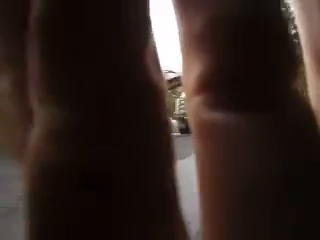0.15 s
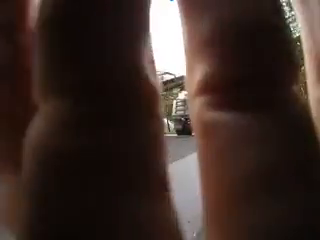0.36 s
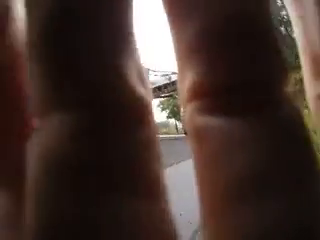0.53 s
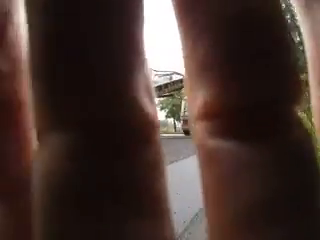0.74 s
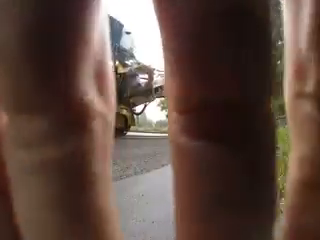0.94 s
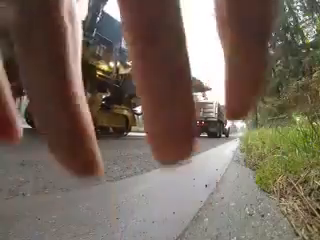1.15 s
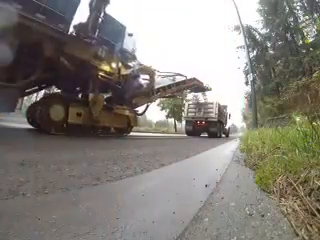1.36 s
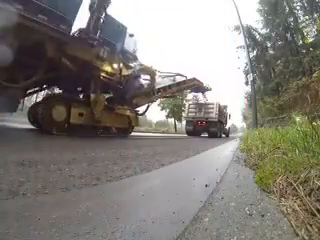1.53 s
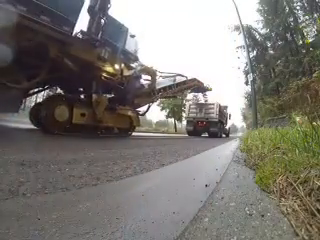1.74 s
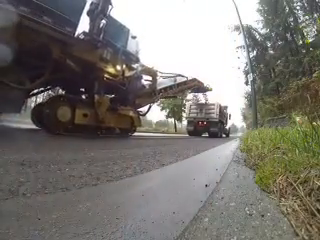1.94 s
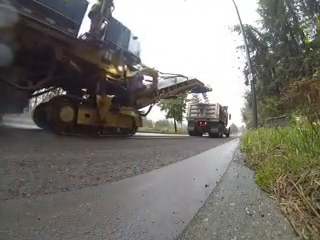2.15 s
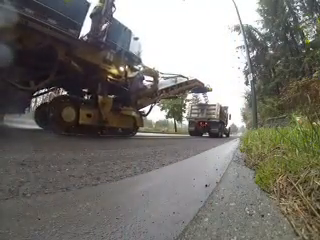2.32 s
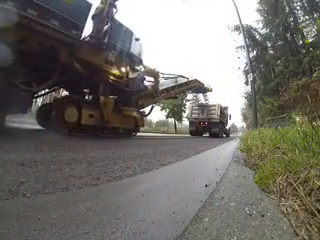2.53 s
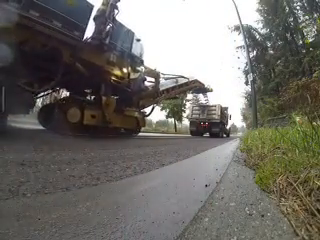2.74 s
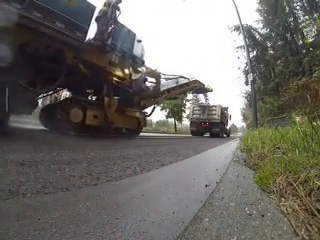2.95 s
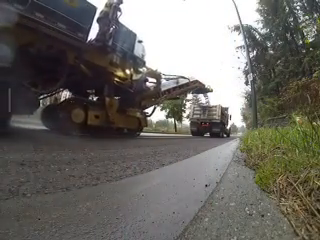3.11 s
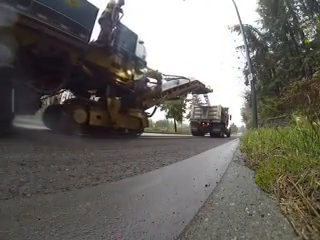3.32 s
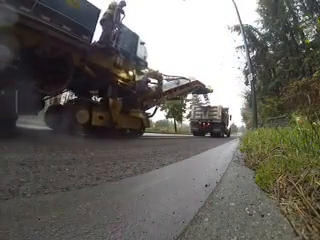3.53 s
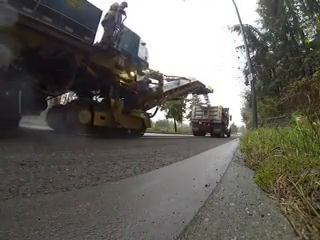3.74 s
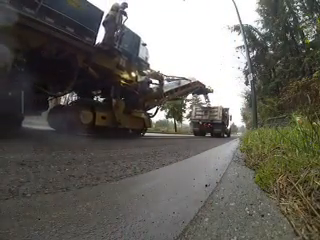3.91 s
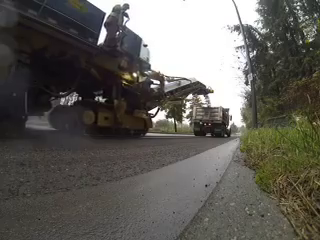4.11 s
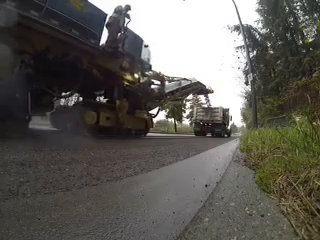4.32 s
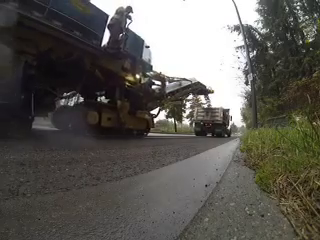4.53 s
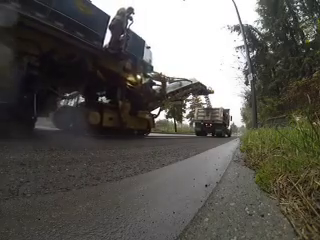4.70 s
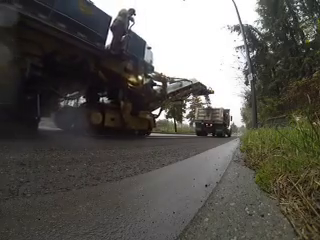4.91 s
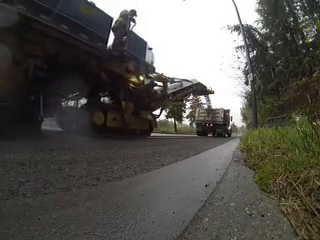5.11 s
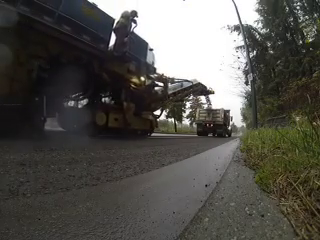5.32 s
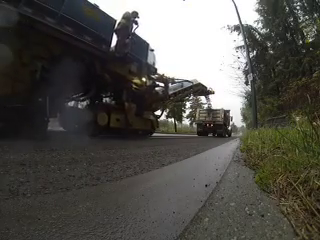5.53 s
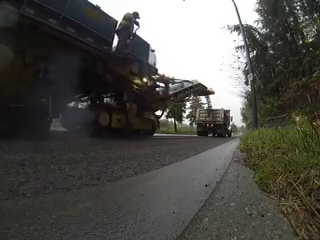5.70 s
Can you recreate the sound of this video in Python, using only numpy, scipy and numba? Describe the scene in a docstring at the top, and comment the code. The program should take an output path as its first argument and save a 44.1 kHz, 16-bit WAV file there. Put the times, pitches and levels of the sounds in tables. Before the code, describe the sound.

Outdoor roadside, microphone boxed inside a small case near the ground. Nasal engine rattle, drum rumble and thin gear whine start at once; a sharp bump, a cluster of clicks with a short scuff, and a duller set-down thud follow quickly. The level dips, creeps back louder, and a low throbbing hum settles under continuous grinding to the end.

```python
"""A diesel road miller grinds asphalt near a small camera in a hard case, which a hand sets down on the kerb.
Engine clatter repeats each cycle through the case resonances; pumps and gears whine as wavering tones.
Drum and ground rumble are shaped noise, the boom a restless tone; knocks ring case modes, and a scuff is noise.
Loud knocks push the gain control down, and it creeps back up."""
import sys
import numpy as np
from scipy import signal
from scipy.fft import rfft, irfft
from scipy.io import wavfile
from scipy.ndimage import uniform_filter1d
from numba import njit

SR = 44100
rng = np.random.default_rng(int(sys.argv[2]) if len(sys.argv) > 2 else 0)


def transcribe(signal):
    """Save signal, clipped to [-1, 1], as a 16-bit WAV file at the path in sys.argv[1]."""
    frames = np.atleast_2d(signal).T
    limited = np.clip(frames, -1, 1)
    pcm = np.round(limited * 32767).astype(np.int16)
    wavfile.write(sys.argv[1], SR, pcm)


N = 254016
T = np.arange(N) / SR

# engine: one cycle is two crank turns
CYCLE_HZ, CYLINDERS, FIRING_DB = 18.465, 8, 0.5
REPEAT_SHARE, MEMORY = 0.61, 0.83  # power share that repeats; part kept from cycle to cycle
ORDERS_DB, RATTLE_DB = -2.5, -19
# levels beside the clatter
RUMBLE_DB, WHINE_BESIDE_DB, GRIT_DB = -2.5, -13, -30
WAVER_DB, PITCH_WAVER_HZ = 2.2, 2.56
# ground rumble in the hand, on the kerb, and its slow growth
GROUND_HELD_DB, GROUND_DOWN_DB, GROUND_RISE_DB_S = -41, -26, 0.61
# the hand lets go; tanh time scale; level changes while it holds the case
LET_GO_S, GRIP_S = 1.11, 0.3
HAND_RUMBLE_DB, HAND_WHINE_DB = 0.5, 0.5
HAND_TOP_DB, HAND_BASS_DB = -5.5, -3
# knocks: length of the push, decay constant of the crack
PUSH_S, CRACK_S = 0.00032, 0.0019
SCUFF_START_S, SCUFF_TOP_S, SCUFF_END_S = 0.401, 0.437, 0.476
SCUFF_TOP_DB, SCUFF_RISE_DB_S, SCUFF_FALL_DB_S = -17, 520, 300
# boom: slow and quick pitch spread, noise beside the tone, rms throb as a share of the level
BOOM_WANDER_HZ, BOOM_SPREAD_HZ = 4.987, 4.98
BOOM_ROUGH_DB, BOOM_THROB = -2, 0.4
GAIN_TOP_DB, ATTACK_S, RELEASE_DB_S = -1.5, 0.00026, 8.5
TOP_HZ = 15100


def undb(db):
    """dB to gain."""
    return 10 ** (np.asarray(db) / 20)


def unit(x):
    """Scale to rms 1."""
    return x / np.sqrt(np.mean(x ** 2))


def colour(x, points):
    """Shape the spectrum by (frequency [Hz], level [dB]) points, silent outside them; rms 1."""
    hz, db = np.transpose(points)
    log_f = np.log(np.arange(N // 2 + 1) * SR / N + 1)
    gain = undb(np.interp(log_f, np.log(hz), db, -150, -150))
    return unit(irfft(rfft(x) * gain, N))


def walk(rate_hz):
    """Random levels held 1 / rate_hz seconds and slewed; rms 1."""
    k = int(SR / rate_hz)
    steps = np.repeat(rng.standard_normal(N // k + 1), k)
    return unit(uniform_filter1d(uniform_filter1d(steps, k), k)[:N])


def ring(x, hz, t60_s):
    """One mode: a sine that decays 60 dB in t60_s."""
    pole = np.exp((2j * np.pi * hz - np.log(1000) / t60_s) / SR)
    return signal.lfilter([1], [1, -pole], x).imag


def wavering_tones(tones):
    """Sum of steady sines, each wavering in level and a little in pitch."""
    total = np.zeros(N)
    for hz, db in tones:
        gain = undb(db + WAVER_DB * walk(7))
        cycles = np.cumsum(hz + PITCH_WAVER_HZ * walk(6)) / SR
        total += gain * np.sin(2 * np.pi * cycles + 7 * rng.random())
    return total * np.sqrt(2)


def clatter(held):
    """Valves and firings repeat their rattle each cycle and slowly forget it; grinding picks never repeat."""
    # case's two lower resonances: (frequency [Hz], density [dB per Hz])
    lower_points = [(410, -36), (700, -19.5), (950, -17.5), (1120, -11.5), (1240, -1), (1390, 2),
                    (1540, -0.5), (1990, -24), (2480, -20), (2700, -14), (2900, -14.5), (2970, -21.5),
                    (3300, -25.5), (4290, -39), (7260, -120)]
    # case's upper resonances: (frequency [Hz], density [dB per Hz])
    upper_points = [(1940, -42), (3300, -7.5), (3690, 0.5), (3970, -8.5), (4260, -6.5), (4360, -12),
                    (4500, -4), (4760, 0.5), (4960, 3.5), (5550, -10), (6500, -16.5), (8450, -47),
                    (14300, -120)]
    # strongest engine orders in the case resonance: (multiple of the cycle [-], level before ORDERS_DB [dB])
    order_levels = [(58, -24), (66, -16), (69, -12), (74, -10), (81, -12), (84, -14)]
    lag = round(SR / CYCLE_HZ)
    fresh = rng.standard_normal((N // lag + 30, lag))  # one row per cycle
    engine = unit(signal.lfilter([1], [1, -MEMORY], fresh, axis=0).ravel()[-N:])
    engine *= undb(FIRING_DB * np.sin(2 * np.pi * CYLINDERS * CYCLE_HZ * T))
    picks = rng.standard_normal(N) * undb(2.0 * walk(60))
    shaking = np.sqrt(REPEAT_SHARE) * engine + np.sqrt(1 - REPEAT_SHARE) * unit(picks)

    upper = colour(shaking + 0.7 * picks, upper_points)
    top_band = signal.butter(2, [4600, 5600], "bandpass", fs=SR, output="sos")
    top = signal.sosfilt(top_band, upper)
    upper = upper + (undb(HAND_TOP_DB * held) - 1) * top  # the hand damps the highest resonance
    orders = wavering_tones([(k * CYCLE_HZ, db + ORDERS_DB) for k, db in order_levels])
    return colour(shaking, lower_points) + undb(RATTLE_DB) * upper + orders


def grit_hiss():
    """Grit and fan: coloured noise, uneven in level."""
    # (frequency [Hz], density [dB per Hz])
    hiss_points = [(3410, -30), (5800, -4.5), (6940, -9), (7810, -5), (9160, -14.5), (9960, -12),
                   (11400, -16), (12300, -21.5), (13800, -19.5), (14400, -22), (15000, -31.5)]
    noise = rng.standard_normal(N) * undb(0.67 * walk(60))
    return colour(noise, hiss_points) * undb(GRIT_DB + 0.5 * walk(12))


def drum_rumble(held):
    """Drum in the asphalt, through air and ground; the soft hand keeps ground-borne bass away."""
    # (frequency [Hz], density [dB per Hz])
    rumble_points = [(18, -37), (30, -10), (47, -3.5), (65, -6), (100, -2.5), (200, -6), (300, -13),
                     (470, -13), (750, -24.5), (1000, -23.5)]
    gain = undb(RUMBLE_DB + HAND_RUMBLE_DB * held + 0.61 * walk(4.76))
    rumble = colour(rng.standard_normal(N), rumble_points) * gain
    bass = signal.sosfiltfilt(signal.butter(2, 200, fs=SR, output="sos"), rumble)
    return rumble + (undb(HAND_BASS_DB * held) - 1) * bass


def ground_rumble(held):
    """Coloured noise through the ground, weak in the hand, stronger on the kerb and slowly growing."""
    # (frequency [Hz], density [dB per Hz])
    ground_points = [(60, -23), (100, -14), (150, 0), (190, -11), (213, 5.5), (235, -3.5), (260, -3),
                     (300, -13.5), (400, -39)]
    down_db = GROUND_DOWN_DB + GROUND_RISE_DB_S * T
    db = GROUND_HELD_DB * held + down_db * (1 - held)
    return colour(rng.standard_normal(N), ground_points) * undb(db)


def whine(held):
    """Pumps and gears: wavering tones; the high gears are clearer while the case faces them."""
    # pump and gear tones: (frequency [Hz])
    tone_hz = [1044, 2089, 2234, 2417, 2611, 2654, 2700, 2749, 2797, 2843, 2939, 2987, 3132, 3224, 3418,
               3655, 4911, 5532]
    # their levels beside the whine: (level [dB])
    tone_db = [-12.5, -22.5, -15, -23.5, -9, -16, -22, -11.5, 0.5, -17, -20, -12.5, -18, -24.5, -17.5,
               -16.5, -15.5, -30]
    # high gear tones: (frequency [Hz], level before the lift [dB])
    gear_tones = [(4175, -17), (4550, -28)]
    # (time [s], lift [dB])
    gear_lift = [(0, -2), (.1, 5), (.28, 3), (.4, -4)]
    lift = undb(np.interp(T, *np.transpose(gear_lift)))
    tones = wavering_tones(zip(tone_hz, tone_db)) + lift * wavering_tones(gear_tones)
    return tones * undb(WHINE_BESIDE_DB + HAND_WHINE_DB * held)


def knocks():
    """Each knock is a short soft push on the case modes; a dry crack of noise goes with it."""
    # (time [s], sharp level [dB], heavy level [dB], direction [+1 or -1], part struck [name])
    knock_list = [(0.2877, 2.5, -0.5, 1, "corner"), (0.2907, -7, -19, 1, "corner"),
                  (0.403, -12, -26, 1, "edge"), (0.418, -14, -26, 1, "edge"), (0.431, -11, -14, 1, "edge"),
                  (0.435, -12, -28, 1, "edge"), (0.438, 0, -6.5, -1, "edge"), (0.4514, -5.5, -8, 1, "edge"),
                  (0.459, -12, -11, -1, "lip"), (0.5626, -6.5, -11, -1, "base"),
                  (0.5684, -13, -5.5, 1, "base"), (0.5729, -4.5, -7.5, 1, "base"),
                  (.5760, -9.5, 0, -1, "base"), (0.59, -25, -23, 1, "base")]
    # tick, clack, ringing thud, dead thud, wobble, hollow, two high clicks: (frequency [Hz], t60 [s])
    case_modes = [(1325, 0.02), (2400, 0.01), (92.4, 0.35), (100, 0.026), (290, 0.12), (335, 0.031),
                  (3300, .02), (4460, .015)]
    # drive of each mode by part: thuds, wobble, hollow beside the heavy level, others beside the sharp [dB]
    part_drive = {"corner": (0, -17, -11.5, -1, -25.5, -18, -30, -34),
                  "edge": (0, -15, -28, 3, -9, -15, -24, -36),
                  "base": (-2.5, -8.5, -22, 0, -16, -2, -16, -18),
                  "lip": (0, -6, -25, -1, -2, -24, -14, -34)}
    blows = np.zeros((len(case_modes), N))
    for s, sharp_db, heavy_db, way, part in knock_list:
        base_db = [sharp_db] * 2 + [heavy_db] * 4 + [sharp_db] * 2
        blows[:, int(s * SR)] = way * undb(np.add(base_db, part_drive[part]))
    push = np.hanning(int(PUSH_S * SR) + 3)
    blows = signal.lfilter(push / push.sum(), [1], blows)
    rings = sum(ring(blow, hz, t60_s) for blow, (hz, t60_s) in zip(blows, case_modes))

    # the clack drive sets the crack envelope
    burst = signal.lfilter([1], [1, -np.exp(-1 / (CRACK_S * SR))], np.abs(blows[1]))
    crack_points = [(300, -13), (2500, 13), (5000, -12.5), (9000, -19.5), (15000, -36)]
    crack = colour(rng.standard_normal(N), crack_points)
    return rings + uniform_filter1d(burst, size=30) * crack


def scuff():
    """Uneven stick and slip of the case on stone: noise that swells and dies away."""
    # (frequency [Hz], density [dB per Hz])
    scuff_points = [(500, -38), (900, -13), (1250, 11), (1700, 1), (2400, -14), (4000, -25), (8000, -52)]
    rise_db = SCUFF_RISE_DB_S * (T - SCUFF_TOP_S)
    fall_db = SCUFF_FALL_DB_S * (SCUFF_TOP_S - T)
    db = SCUFF_TOP_DB + np.minimum(rise_db, fall_db)
    touching = uniform_filter1d(1.0 * ((T > SCUFF_START_S) & (T < SCUFF_END_S)), size=200)
    slips = rng.standard_normal(N) * undb(5.0 * walk(220.2))
    return touching * undb(db) * colour(slips, scuff_points)


def boom():
    """Low frame and ground resonance shaken by the drum: a restless pitch with rough noise around it."""
    # weak in the hand, strong on the ground: (time [s], pitch [Hz], level [dB])
    boom_course = [(0.619, 104, -31), (.95, 110, -27.5), (1.3, 114, -21), (1.8, 116, -14.5),
                   (2.6, 112, -16.5), (3.3, 120, -15), (3.899, 123, -15), (4.499, 117, -15.5),
                   (5.4, 118, -13.5), (5.76, 122, -17)]
    s, hz, db = np.transpose(boom_course)
    pitch_hz = np.interp(T, s, hz) + BOOM_WANDER_HZ * walk(9) + BOOM_SPREAD_HZ * walk(30)
    tone = np.sqrt(2) * np.sin(2 * np.pi * np.cumsum(pitch_hz) / SR)
    rough_points = [(60, -27), (90, -6), (118, 3), (150, -2.5), (200, -27.0)]
    rough = colour(rng.standard_normal(N), rough_points)
    throb = walk(26)
    throb = unit(throb - uniform_filter1d(throb, size=SR // 4))  # quick beats, no long swells
    gain = undb(np.interp(T, s, db, -60)) * (1 + BOOM_THROB * throb)
    return gain * unit(tone + undb(BOOM_ROUGH_DB) * rough)


def scene():
    """Most machine layers follow one level; letting go of the case hands it over to the ground."""
    # machine level, with part of the dip and slow recovery heard after the knocks:
    # (time [s], clatter level [dB])
    level_course = [(0, -27), (.15, -25), (.28, -24), (.36, -32.5), (.7, -30.5), (1.0, -27.5), (1.7, -21),
                    (2.5, -20), (3.3, -19.5), (3.6, -21.5), (5.2, -21.5), (5.76, -20)]
    level = undb(np.interp(T, *np.transpose(level_course)))
    held = 0.5 - 0.5 * np.tanh((T - LET_GO_S) / GRIP_S)  # 1 in the hand, 0 on the kerb
    load = undb(0.56 * walk(10))  # the bite of the drum varies
    grinding = level * (clatter(held) + grit_hiss() + drum_rumble(held))
    machine = load * (grinding + ground_rumble(held)) + level * whine(held) + boom()
    return (machine + knocks() + scuff())[None]


@njit
def ride(x, top, attack, release):
    """Gain falls fast while the output is over the top and climbs back at a steady dB rate."""
    y, g = np.empty(len(x)), 1.
    for i in range(len(x)):
        y[i] = g * x[i]
        if abs(y[i]) > top:
            g *= 1 - attack * (abs(y[i]) / top - 1)
        else:
            g = min(1., g * release)
    return y


def record(dry):
    """Gain control, overload at full scale, and a steep top cut."""
    ridden = ride(dry[0], undb(GAIN_TOP_DB), 1 / (ATTACK_S * SR), undb(RELEASE_DB_S / SR))
    clipped = np.clip(ridden, -1, 1)
    top_cut = signal.ellip(10, 0.2, 70, TOP_HZ, fs=SR, output="sos")
    return signal.sosfilt(top_cut, clipped)[None]


dry = scene()
out = record(dry)
transcribe(out)
```